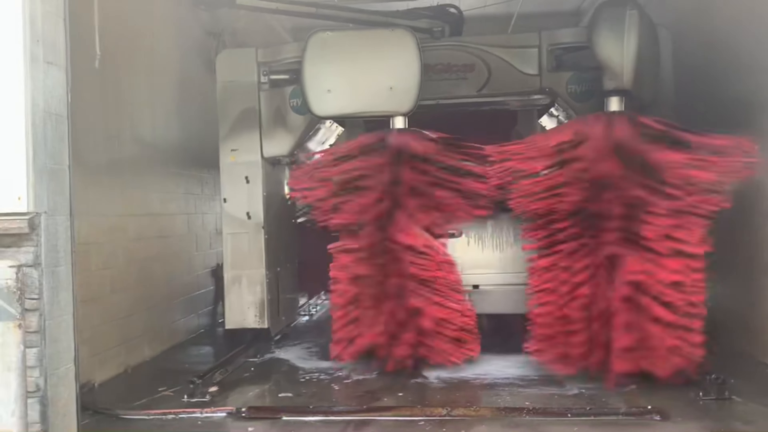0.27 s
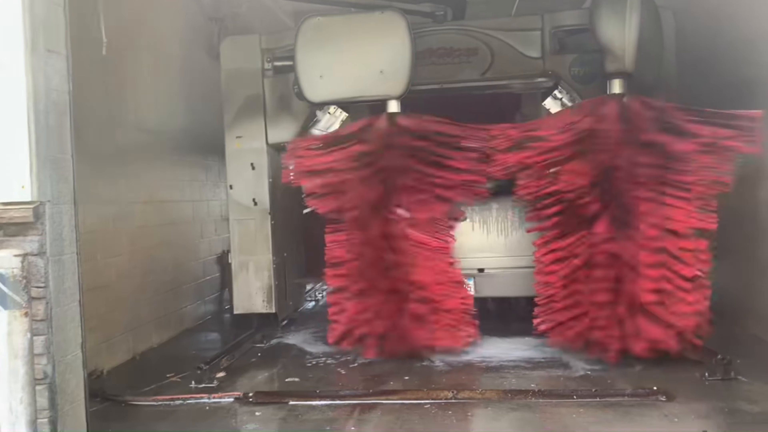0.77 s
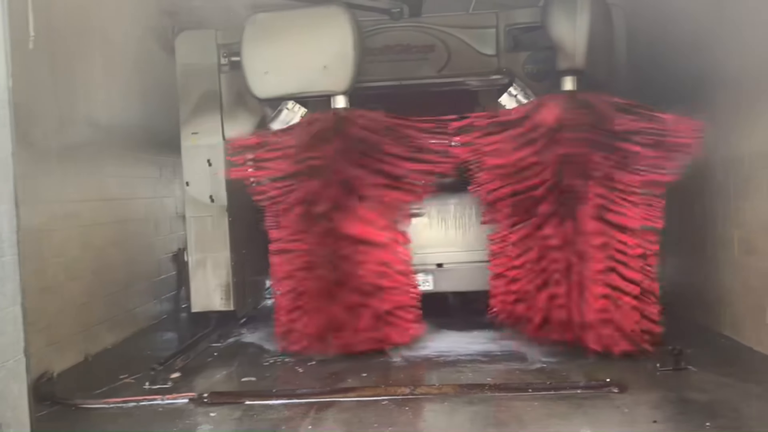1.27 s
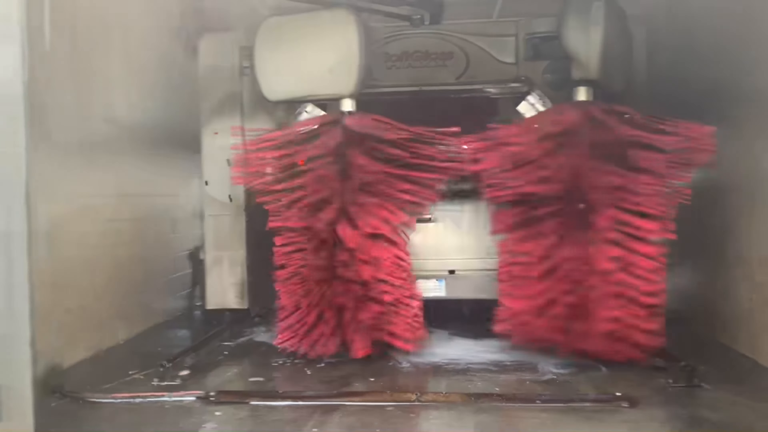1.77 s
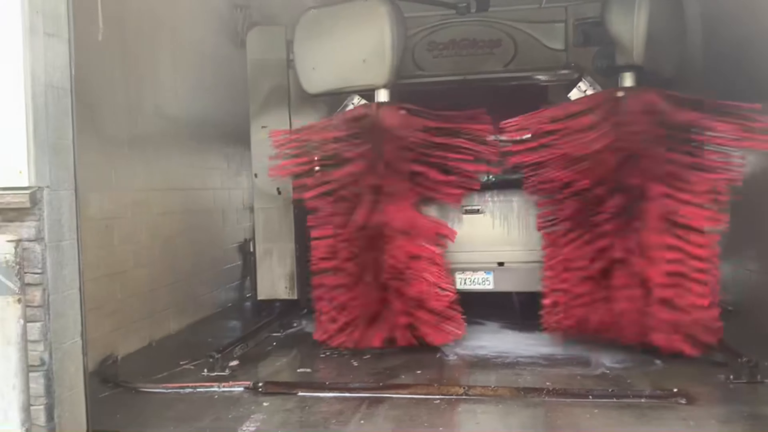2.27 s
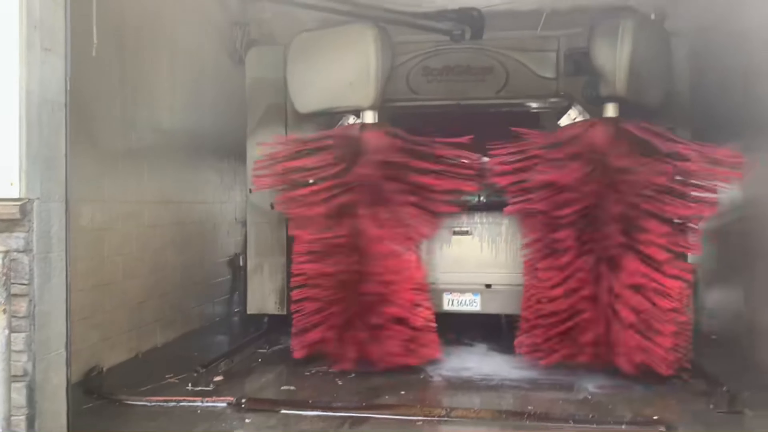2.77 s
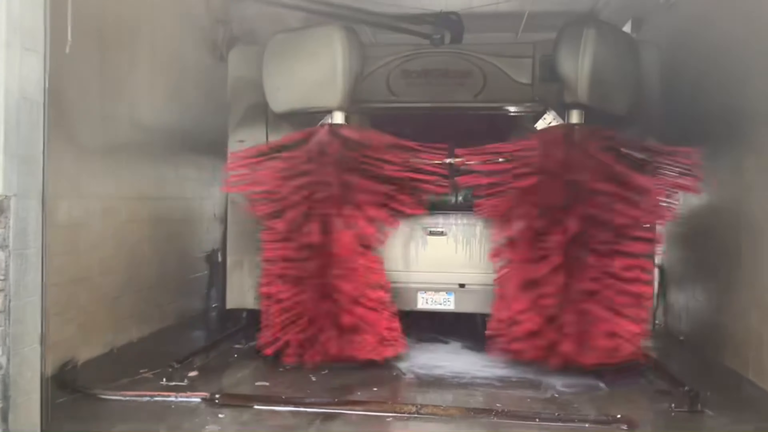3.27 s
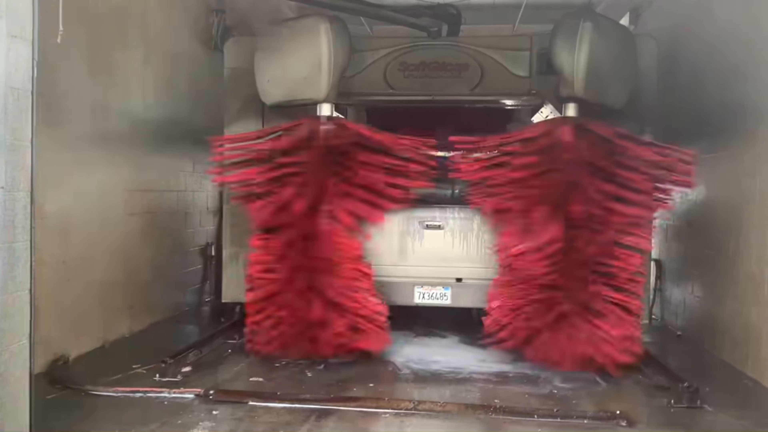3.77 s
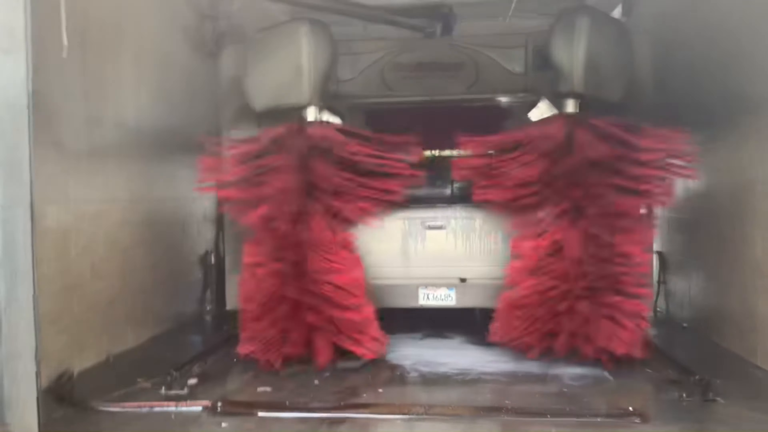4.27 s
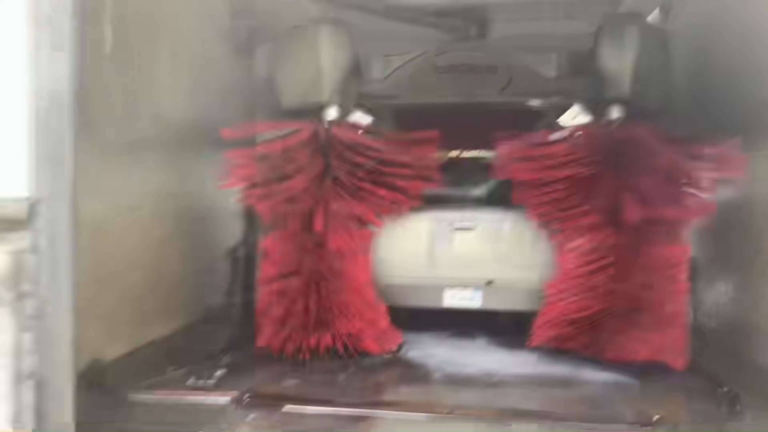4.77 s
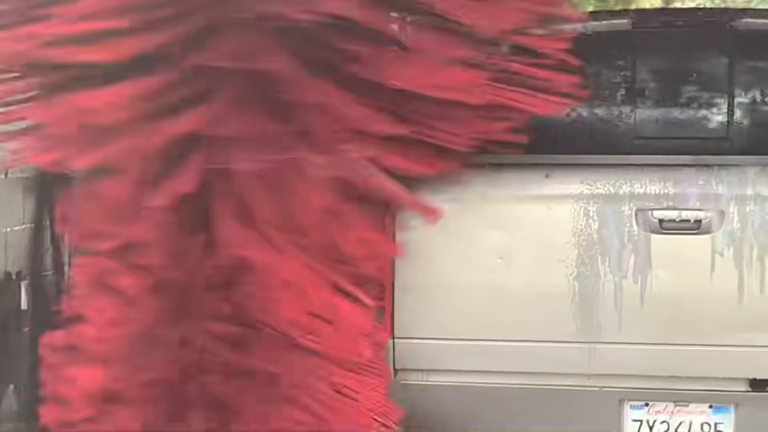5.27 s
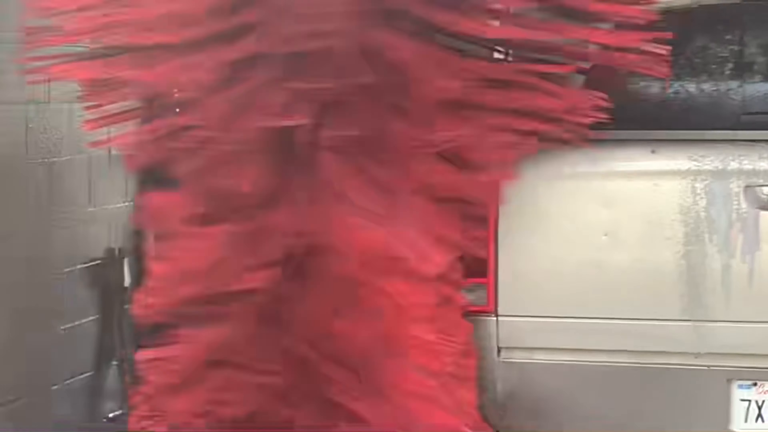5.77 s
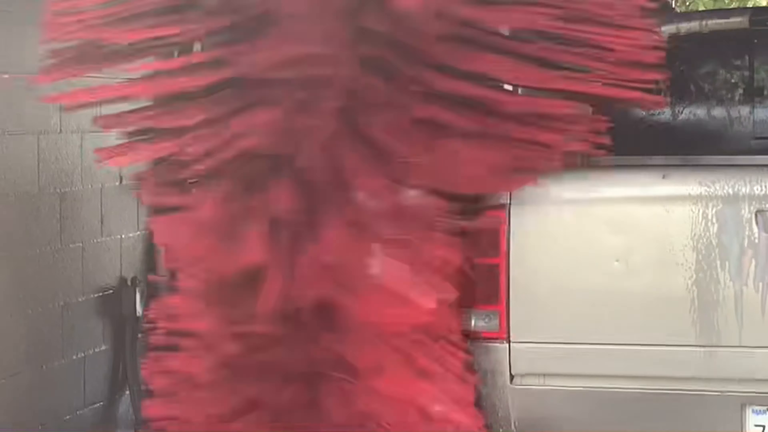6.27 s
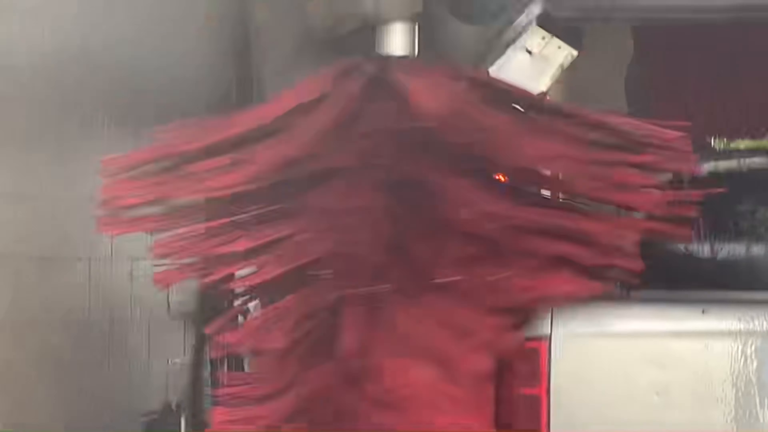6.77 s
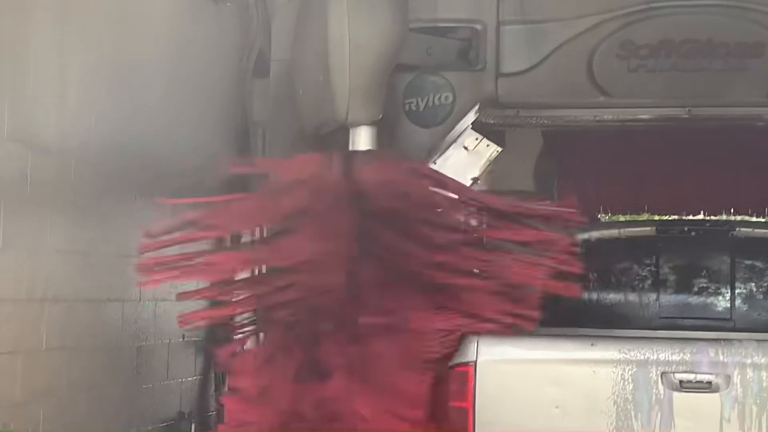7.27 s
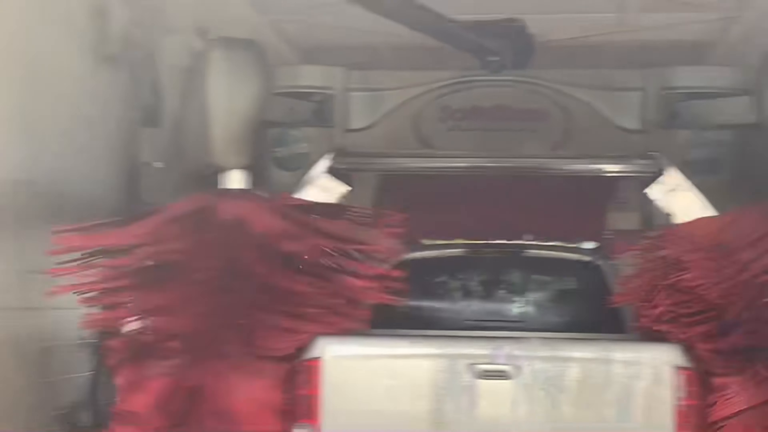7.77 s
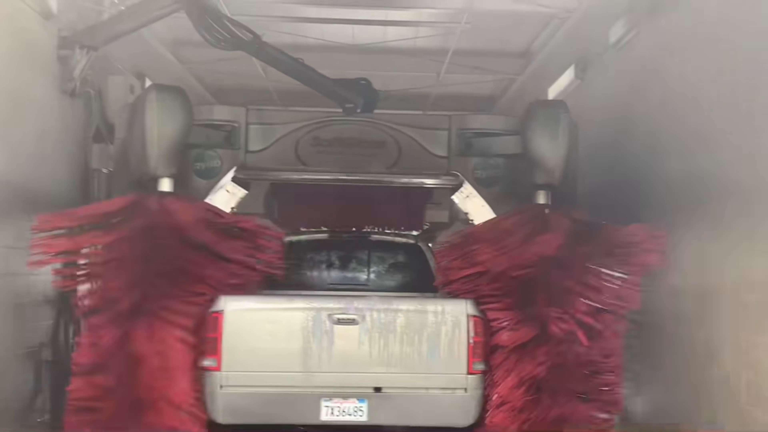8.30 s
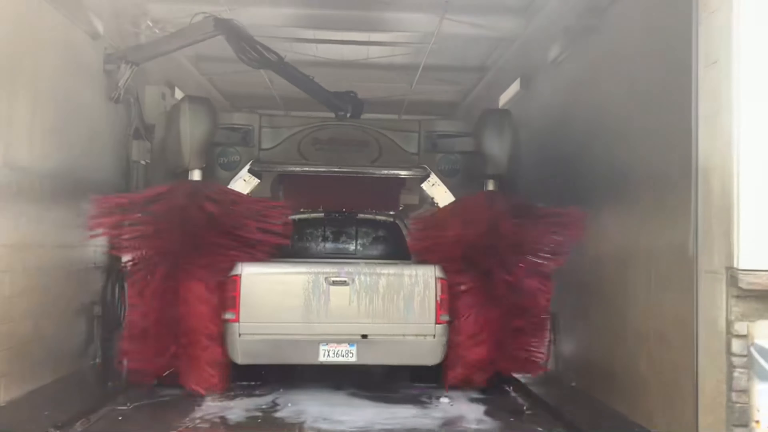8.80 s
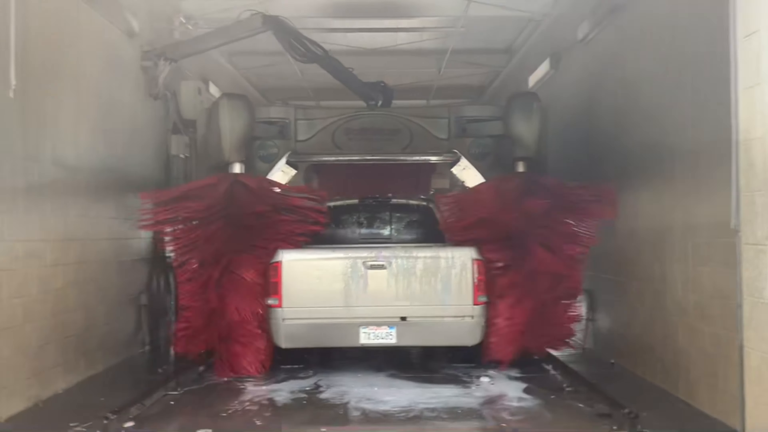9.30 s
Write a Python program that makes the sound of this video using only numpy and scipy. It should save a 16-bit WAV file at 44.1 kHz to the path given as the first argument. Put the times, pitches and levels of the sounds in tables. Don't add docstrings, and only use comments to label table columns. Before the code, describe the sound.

A dense, steady car wash roar: deep motor hum, muffled rapid drumming of soaked cloth on bodywork, dull flapping and wide water hiss. It grows fuller and wetter towards the middle, where two small finger taps knock the phone case and a thin hissy whistle rises and falls. Afterwards the drumming softens and the machine carries on without stopping. Stereo phone pickup from the bay entrance, reverberant and hard-walled.

```python
import sys
import numpy as np
from scipy import signal
from scipy.fft import rfft, irfft, next_fast_len
from scipy.io import wavfile
from scipy.ndimage import uniform_filter1d, map_coordinates

SR = 44100
rng = np.random.default_rng(int(sys.argv[2]) if len(sys.argv) > 2 else 0)


def volts_from_decibels(level):
    exponent = np.asarray(level, float) / 20
    return 10 ** exponent


def store_wav(level_fs):
    pcm = np.round(np.clip(np.atleast_2d(level_fs), -1, 1) * 32767)
    wavfile.write(sys.argv[1], SR, pcm.T.astype(np.int16))


N = 420713
T = np.arange(N) / SR
SIZE = next_fast_len(N)
HZ = np.maximum(np.arange(SIZE // 2 + 1) * SR / SIZE, 1)


def along(table, outside=None):
    hz, value = np.transpose(table)
    return np.interp(np.log(HZ), np.log(hz), value, outside, outside)


def curves(table):
    s, *columns = np.transpose(table)
    return [uniform_filter1d(np.interp(T, s, c), size=3000) for c in columns]


def walk(rate):
    k = int(SR / rate)
    held = np.repeat(rng.standard_normal(N // k + 1), k)
    slewed = uniform_filter1d(uniform_filter1d(held, k), k)
    return 1.3 * slewed[:N]


# f/Hz, likeness/0-1
ALIKE = [(40, .88), (100, .91), (200, .965), (400, .93), (700, .78), (950, .85), (1300, .55), (1800, .2),
         (3000, .3), (5500, .15), (6300, .52), (7200, .62), (8000, .96), (16000, .97)]
# f/Hz, phase by which the left trails/turns
LAG = [(1500, 0), (2100, .15), (5600, -1.5), (6200, -1.05), (7000, -.92), (7550, -.75), (7850, -.55),
       (9200, -.45), (9750, -.27), (10400, -.05), (11600, .05), (12150, .25), (12500, .45), (14300, .55),
       (14750, .75), (15250, .97)]
# f/Hz, level left minus right/dB
TILT = [(200, -1), (500, 0), (1300, 0.5), (2500, -1), (4000, 0), (5500, -4), (7000, 1)]


def ports(near, far):
    alike = np.clip(along(ALIKE), 0, 1)
    lag = np.exp(1j * np.pi * along(LAG))
    mid, side = near * np.sqrt(1 + alike), far * np.sqrt(1 - alike)
    tilt = volts_from_decibels(along(TILT) / 2)
    return np.array([(mid + side) / lag * tilt, (mid - side) * lag / tilt])


def widen(pair, width_db):
    mid, side = (pair[0] + pair[1]) / 2, (pair[0] - pair[1]) / 2 * volts_from_decibels(width_db)
    return np.array([mid + side, mid - side])


def panned(pair, gain_db, left_minus_right_db):
    return volts_from_decibels(gain_db + np.array([left_minus_right_db, -left_minus_right_db]) / 2) * pair


def grains(per_s, spread_db, smear_s):
    hit = rng.random(N) < per_s / SR
    size = volts_from_decibels(spread_db * rng.standard_normal(N)) * hit
    fall = np.exp(-1 / (smear_s * SR))
    energy = signal.lfilter([1], [1, -fall], size ** 2, zi=[per_s * smear_s])[0]
    return rfft(np.sqrt(energy) * rng.standard_normal((2, N)), SIZE)


def layers(drive, colour, splits_hz, flicker_db, flicker_hz):
    pair = ports(*drive) * volts_from_decibels(along(colour, outside=-200))
    above = [1] + [1 / (1 + (hz / HZ) ** 16) for hz in splits_hz] + [0]
    out = []
    for a, b in zip(above, above[1:]):
        part = irfft(pair * np.sqrt(np.maximum(a - b, 0)), SIZE)[:, :N]
        out.append(part / np.sqrt(np.mean(part ** 2)) * volts_from_decibels(flicker_db * walk(flicker_hz)))
    return out


# t/s, push on the panels level/dB, water in the cloth level/dB, flap of free strips level/dB
BRUSHES = [(0, -2.5, -3.5, 1), (.4, -2, -0.5, 0.5), (1.0, 0.5, 1, 1.5), (1.25, 0, 5, 3.5), (2.0, 0.5, 2, 2),
           (2.8, 0.5, 1.5, 3), (3.3, 1, 2.5, 3.5), (3.7, 2.5, 2.5, 4.5), (4.3, 4, 5, 4), (4.9, 4, 4.5, 1),
           (5.4, 2, -0.5, -0.5), (6.1, -0.2, -4.5, -3.5), (6.7, -1, -2, -2), (7.1, 0.5, -0.1, 0),
           (7.9, -1.5, -0.5, -1.5), (8.6, -3.5, -1.5, -3.5), (9.1, -3, -1, -3), (9.54, -3, 0.5, -2.5)]
ANSWERS = {"deep": (-27, -1.1, .03, 0.72, -0.06), "drone": (-31, -0.36, -0.74, 1.4, -0.4),
           "large": (-25.5, 1.3, -0.2, 0, 0.05), "middle": (-25.5, 0.54, .18, 0.8, -0.46),
           "small": (-26.5, 0.96, 0.1, -0.57, 0.49), "dull": (-33, -0.22, 0.07, 1.36, -0.64),
           "sharp": (-29, 0.22, -0.18, 0.77, 0.04), "swish": (-34.5, 0.13, 0.04, 0.58, -0.33),
           "ring": (-42.5, 1.07, 0.5, -0.7, 1.05), "splash": (-38, 0.57, 0.95, 0.05, 0.08),
           "spray": (-42, 0.36, 0.58, 0.35, -0.26), "mist": (-40, -0.43, 0.8, 0.1, -0.41)}
# t/s, level change/dB, half length/s, sound
SWELLS = [(.05, -4.5, 0.33, "middle"), (0.047, 6.5, 0.14, "large"), (0.154, 2, .06, "splash"),
          (.6, 2, 0.12, "drone"), (.55, 3, .12, "large"), (.1, -2, .15, "sharp"), (.7, 1, 0.2, "swish"),
          (2.0, -0.5, 0.18, "middle"), (2.5, 2, .1, "dull"), (4.214, 3.5, 0.13, "small"),
          (5.05, 2.5, .25, "large"), (8.303, -1.5, 0.19, "small"), (1.133, 3, 0.035, "splash"),
          (1.14, 6, 0.053, "ring"), (1.75, -7, 0.046, "dull"), (2.7, -6, 0.067, "dull"),
          (2.897, -0.5, 0.16, "sharp"), (2.8, -2.5, 0.086, "swish"), (3.505, 2.5, 0.14, "sharp"),
          (3.7, 6.5, 0.16, "small"), (4.164, 5, 0.053, "swish"), (4.35, 9, 0.14, "ring"),
          (4.36, 3, 0.12, "swish"), (4.4, -12, 0.12, "drone"), (4.695, 2, 0.086, "splash"),
          (5.262, 5, 0.046, "ring"), (5.6, -2.5, 0.27, "deep"), (5.902, 9, 0.13, "middle"),
          (9.199, 6, 0.67, "middle"), (9.35, 2.5, 0.11, "spray")]


def levels(*names):
    controls = curves(BRUSHES)
    out = []
    for name in names:
        rest_db, *slopes, per_s = ANSWERS[name]
        db = rest_db + per_s * (T - T[-1] / 2)
        db = db + sum(slope * control for slope, control in zip(slopes, controls))
        db = db + sum(d * np.exp(-((T - s) / half) ** 2) for s, d, half, who in SWELLS if who == name)
        out.append(db + 0.6 * walk(6))
    return out


def played(parts, levels_db):
    return sum(volts_from_decibels(db) * part for part, db in zip(parts, levels_db))


# f/Hz, level against their band/dB
HUM = [
    (83, 0.4),
    (125.5, 0.5),
    (203.5, -2),
    (292, -5),
]


def hum(tones):
    out = []
    for hz, db in tones:
        swell = volts_from_decibels(db + 1.2 * walk(5))
        pitch_hz = hz * (1 + 0.015 * walk(12))
        out.append(swell * np.sin(2 * np.pi * np.cumsum(pitch_hz) / SR))
    return out


# f/Hz, level per Hz/dB
RUMBLE = [(13, -49), (22, -24.5), (70, 4.5), (102, -7.5), (124, 3.5), (150, -5), (200, -31), (330, -120)]


def pump():
    deep_tone, drone_tone = hum(HUM[:2])
    deep, drone = layers(grains(3400, 1.1, 0.11), RUMBLE, [100], 0.37, 2.9)
    return played([volts_from_decibels(0.2) * deep + deep_tone, volts_from_decibels(0.1) * drone + drone_tone], levels("deep", "drone"))


# f/Hz, level per Hz/dB
WET = [(1500, 0), (1650, 6), (2000, 8.5), (2600, 5), (3000, 7), (4000, 7), (5000, 10.5), (5700, 9)]
# f/Hz, level per Hz/dB
MIST = [(7500, -1), (8200, 0), (10000, -2), (12000, -5), (13600, -6.5), (14600, -10.5), (15300, -7),
        (16500, -7)]
WATER_SPLITS_HZ = [2710, 3160, 4520, 7440]


def nozzles():
    spray_db, mist_db = levels("spray", "mist")
    spray, mist = layers(grains(3000, 2.7, 0.062), WET + MIST, WATER_SPLITS_HZ, 0.32, 16)[3:]
    return played([spray, mist], [spray_db + 1.0, mist_db + 6.5])


# t/s, peak level/dB, start f/Hz, end f/Hz, t60/s
TAPS = [
    (3.348, -7, 1700, 380, .035),
    (4.418, -9, 1500, 300, .04),
    (4.441, -18, 200, 120, .16),
    (4.466, -17, 140, 70, .06),
]


def taps():
    out = np.zeros(N)
    for s, db, start_hz, end_hz, t60 in TAPS:
        t = np.maximum(T - s, 0)
        slide = t60 / 25
        turns = end_hz * t + (start_hz - end_hz) * slide * (1 - np.exp(-t / slide))
        out += volts_from_decibels(db) * np.exp(-np.log(1000) * t / t60) * np.sin(2 * np.pi * turns)
    return out * np.array([[1], [-1]])


# t/s, centre f/Hz, level/dB
FILM = [
    (3.9, 2700, -64),
    (4.2, 2850, -46),
    (4.36, 3070, -33),
    (4.7, 3890, -42),
    (4.95, 3510, -44),
    (5.27, 3150, -42),
    (5.5, 3050, -53),
    (7.3, 3000, -48),
    (9.54, 3000, -48),
]


def film():
    hz, db = curves(FILM)
    width_hz = 450
    slow = signal.lfilter(*signal.butter(2, width_hz / 2, fs=SR), rng.standard_normal((2, N)))
    phase = 2 * np.pi * np.cumsum(hz) / SR
    hiss = slow[0] * np.cos(phase) + slow[1] * np.sin(phase)
    return volts_from_decibels(db) * hiss / np.sqrt(np.mean(hiss ** 2))


# t/s, peak level/dB, f/Hz, t60/s
WHIPS = [
    (.23, -28, 9000, .06),
    (1.13, -38, 3800, .25),
    (3.27, -32, 8000, .05),
    (3.44, -24, 10000, 0.087),
    (4.27, -37, 7000, 0.091),
    (6.812, -24, 12000, .04),
]


def whips():
    out = np.zeros((2, SIZE // 2 + 1), complex)
    for s, db, hz, t60 in WHIPS:
        fade = (T >= s) * np.exp(-np.log(1000) * np.abs(T - s) / t60)
        band = np.exp(-(np.log(HZ / hz) / 0.76) ** 2) * np.sqrt(SR / hz)
        out += volts_from_decibels(db) * band * rfft(fade * rng.standard_normal((2, N)), SIZE) / 2
    return irfft(ports(*out), SIZE)[:, :N]


# f/Hz, level per Hz/dB
DRUM = [(82, -42), (140, -5), (166, -1), (199, 0.5), (236, -4), (284, -1), (330, -5), (426, -4.5),
        (580, -9), (750, -2.5), (1280, -120)]


def panels():
    large_tone, middle_tone = hum(HUM[2:])
    large, middle, small, _ = layers(grains(1200, 3, .05), DRUM, [245, 340, 555], .3, 8)
    parts = [volts_from_decibels(0.74) * large + large_tone, volts_from_decibels(-3.0) * middle + middle_tone, small]
    return played(parts, levels("large", "middle", "small"))


# t/s, slap level left minus right/dB, water level left minus right/dB
AIM = [(0, 1.5, -0.5), (3.1, 1, -0.3), (4.2, 3.5, 1), (4.6, -2, 2.5), (5.8, -1.5, 1), (7.0, 1, 2.5),
       (8.5, 5, 6), (9.1, 1, 2), (9.54, 2, .6)]
# f/Hz, level per Hz/dB
SLAP = [(320, 15), (540, 1.5), (1000, -3.5), (1220, -5), (1700, -9), (2210, -21), (3740, -120)]


def slaps():
    _, dull, sharp = layers(grains(1500, 3, .035), SLAP, [555, 850], .25, 9)
    return panned(played([dull, sharp], levels("dull", "sharp")), 0.93, curves(AIM)[0])


# t/s, width level/dB
RING_WIDTH = [(0, 2.5), (1.8, 0), (3.7, 2), (4.2, -3), (5.7, -5), (6.7, -1), (8.2, -5), (9.54, -4)]


def wet_cloth():
    swish, ring, splash = layers(grains(2500, 2.4, 0.08), WET + MIST, WATER_SPLITS_HZ, 0.21, 14)[:3]
    parts = [swish, widen(ring, *curves(RING_WIDTH)), widen(splash, 2.2)]
    return panned(played(parts, levels("swish", "ring", "splash")), 0.5, curves(AIM)[1])


# t/s, level/dB
SLOSHES = [(.17, -2.5), (.45, 1.5), (.67, 0.8), (1.04, -2), (1.5, 0), (2.1, 2), (2.28, -1.5), (2.4, 0.5),
           (2.75, -0.2), (3.25, 0.5), (3.6, 2), (3.85, 1), (4.02, 0.3), (4.55, 0.2), (4.73, 0.5),
           (5.22, 0.5), (5.9, 0.8), (6.55, 0.8), (6.7, -1), (6.82, 1), (7.25, 0.5), (8.45, 1.2), (8.99, -2),
           (9.35, 1)]


def water():
    slosh_half_s, brush_hz = 0.048, 2.8
    slosh_db = sum(db * np.exp(-((T - s) / slosh_half_s) ** 2) for s, db in SLOSHES)
    turn_db = -0.06 * np.sin(2 * np.pi * brush_hz * T + 1.3)
    return volts_from_decibels(0.3 * walk(16) + slosh_db + turn_db) * (nozzles() + wet_cloth())


def scene():
    return pump() + taps() + film() + whips() + panels() + slaps() + water()


def grainy_patches(pair, sharpen, patchy_db, patch_hz, patch_s):
    mix = np.array([[1, 0.93], [1, -0.93]])
    top_hz = 15660
    hz, s, bins = signal.stft(mix @ pair / 2, SR, nperseg=1024)
    size = np.abs(bins) + 1e-12
    usual = uniform_filter1d(uniform_filter1d(size, size=15, axis=1), size=9, axis=2)
    reach = np.clip(np.log2(np.maximum(hz, 1) / 250) / 5.5, 0, 1)[:, None]
    field = rng.standard_normal((2, 400, 1000))
    place = np.meshgrid([0, 1], hz / patch_hz, s / patch_s, indexing="ij")
    patches = volts_from_decibels(patchy_db * reach * map_coordinates(field, place, order=1))
    bins = bins * (size / usual) ** (sharpen * reach) * patches * (hz < top_hz)[:, None]
    return mix @ signal.istft(bins, SR, nperseg=1024)[1][:, :N]


def top_cut(x):
    return signal.sosfilt(signal.butter(12, 16900, fs=SR, output="sos"), x)


def record(dry):
    soft = volts_from_decibels(-0.84) * np.tanh(0.65 * dry) / 0.75
    clean = grainy_patches(soft, sharpen=.6, patchy_db=2.0, patch_hz=90, patch_s=.04)
    return top_cut(clean)


dry = scene()
out = record(dry)
store_wav(out)
```